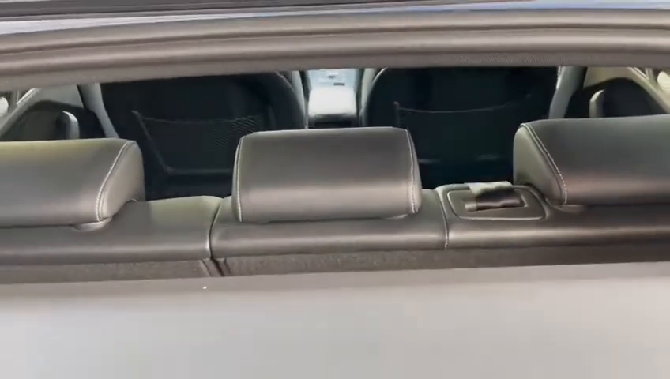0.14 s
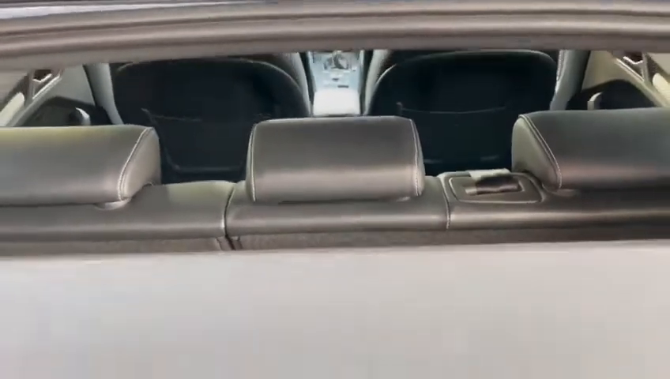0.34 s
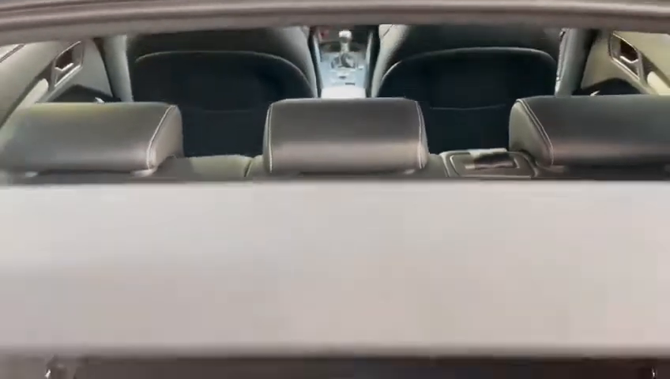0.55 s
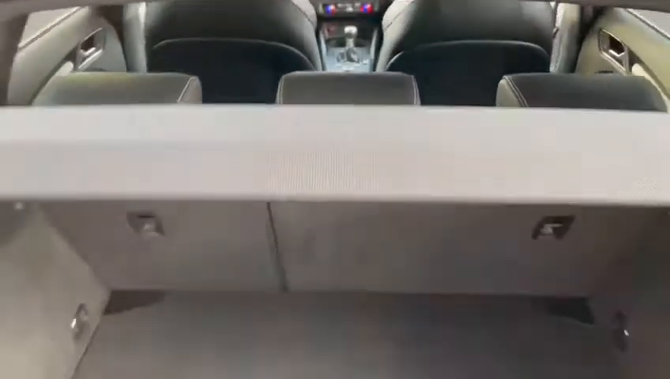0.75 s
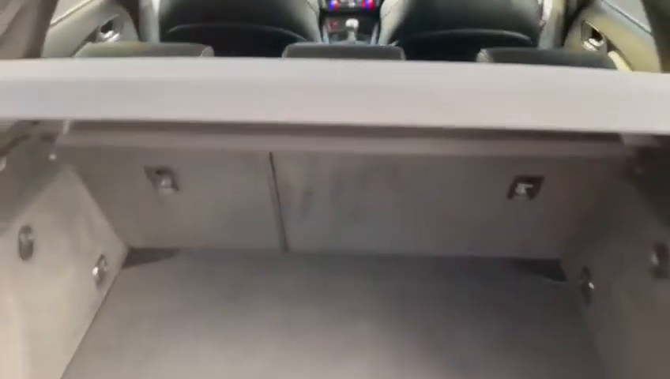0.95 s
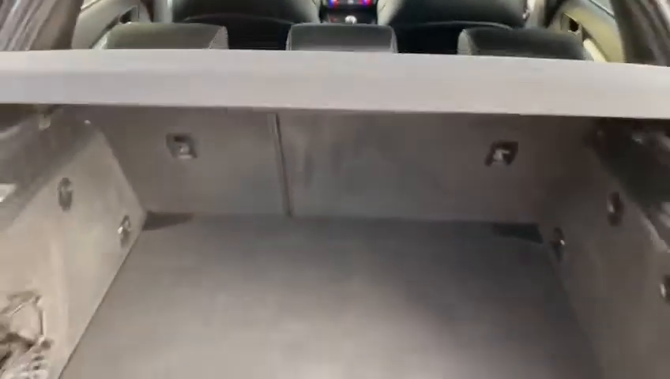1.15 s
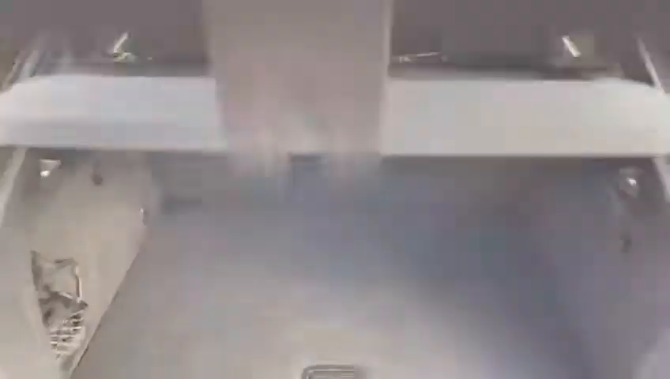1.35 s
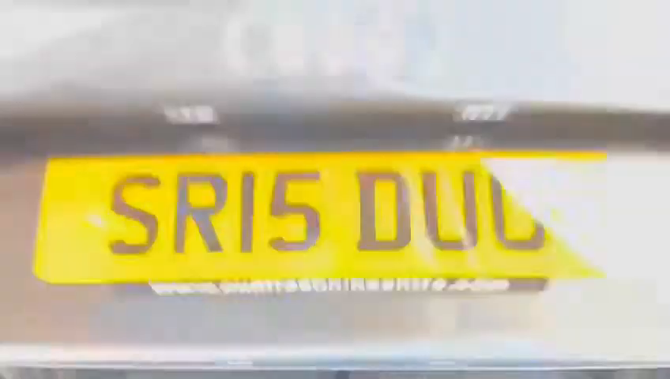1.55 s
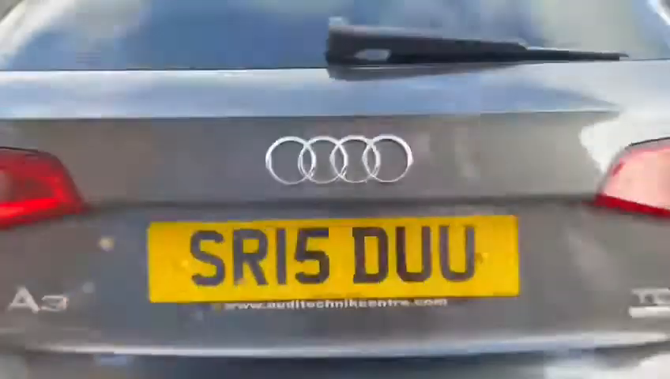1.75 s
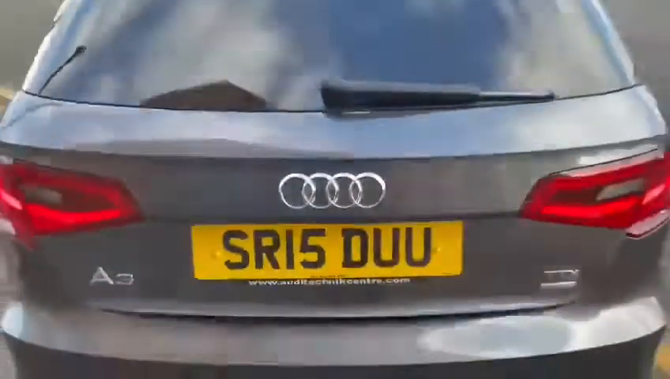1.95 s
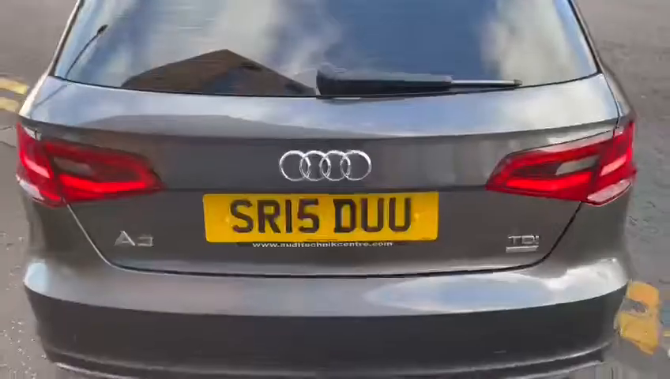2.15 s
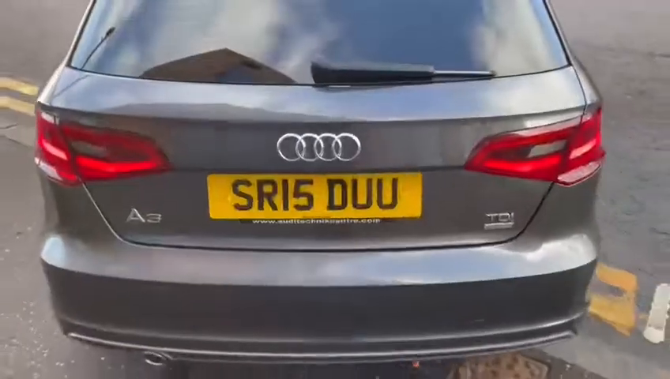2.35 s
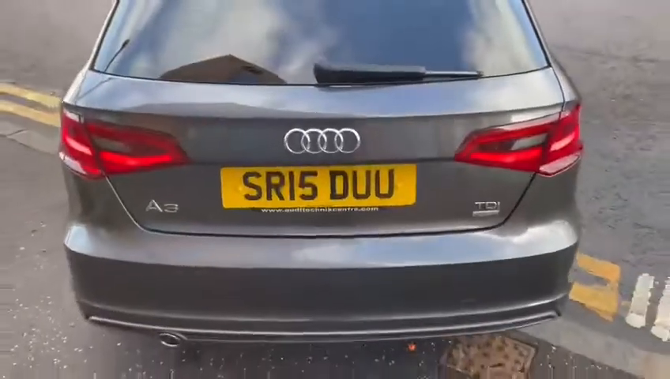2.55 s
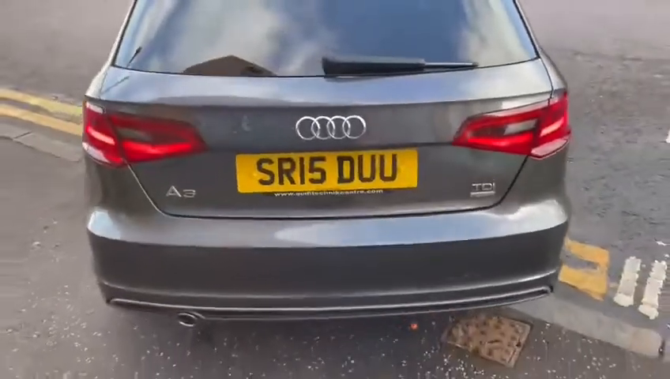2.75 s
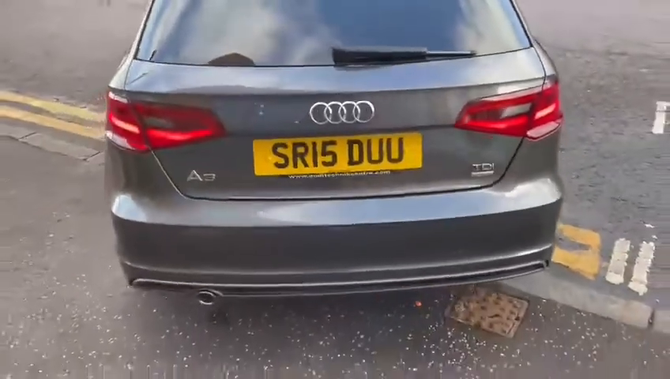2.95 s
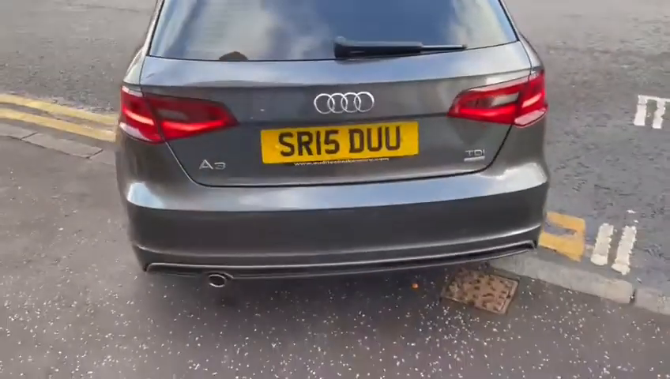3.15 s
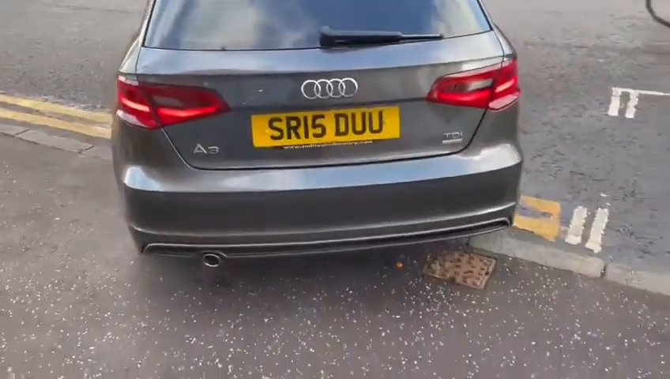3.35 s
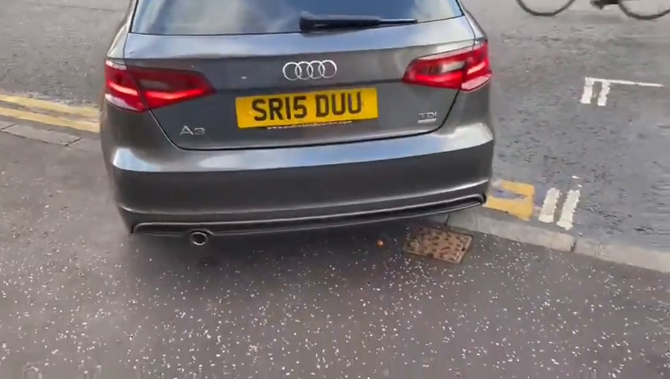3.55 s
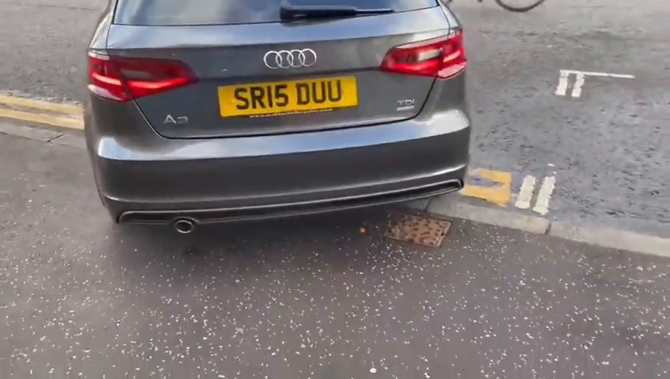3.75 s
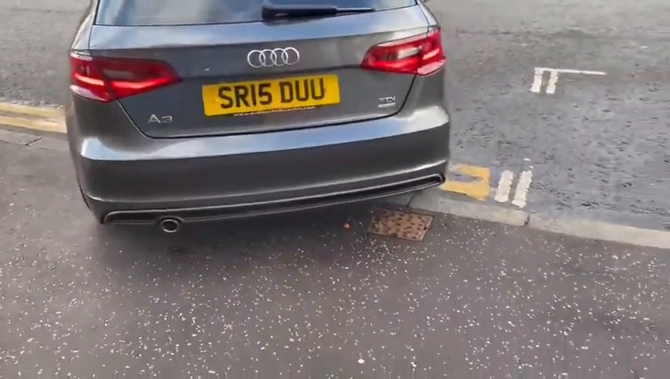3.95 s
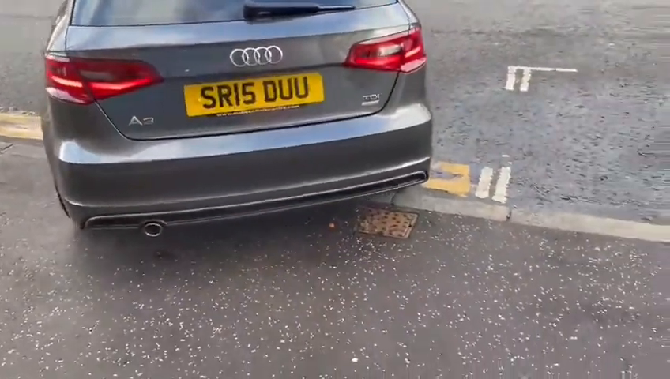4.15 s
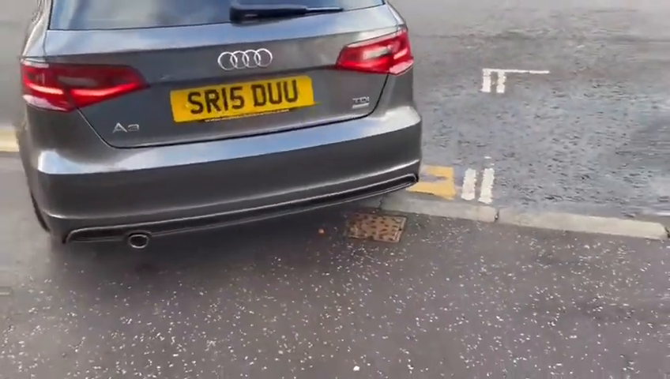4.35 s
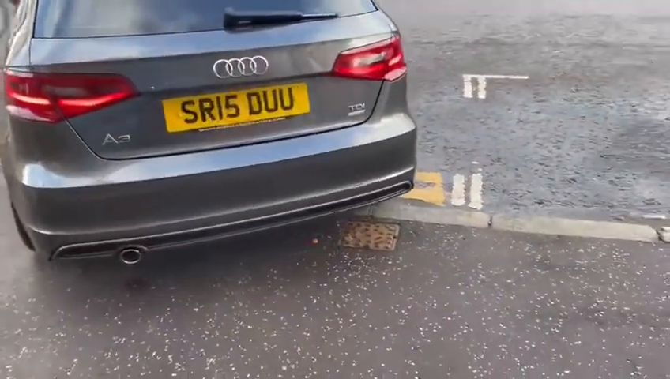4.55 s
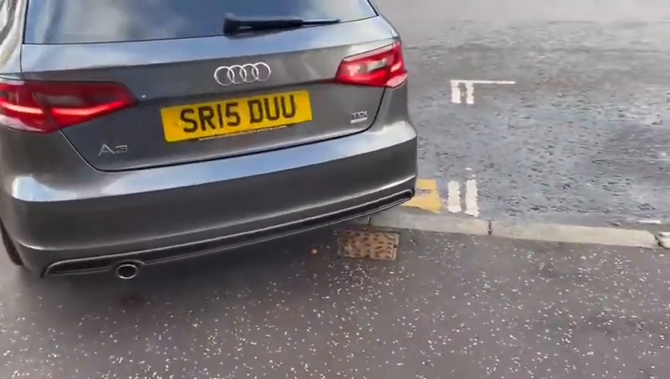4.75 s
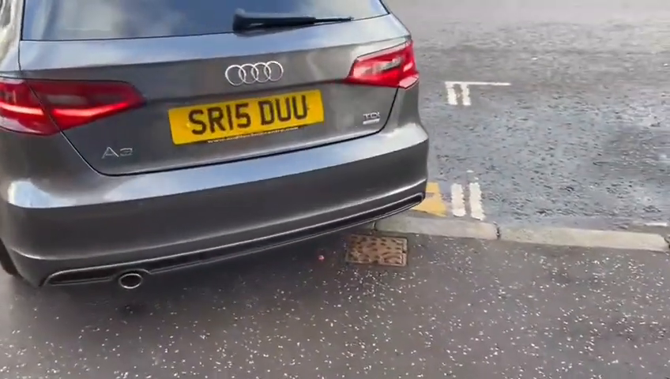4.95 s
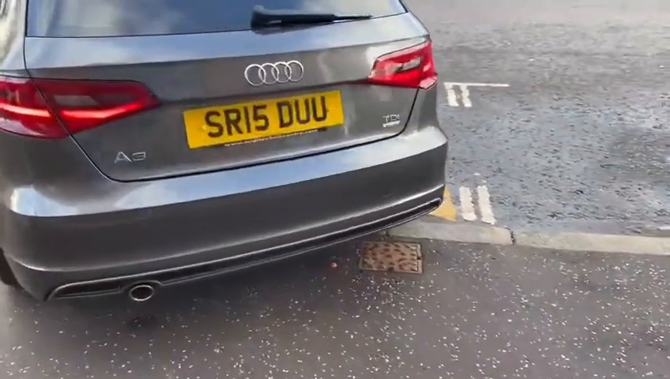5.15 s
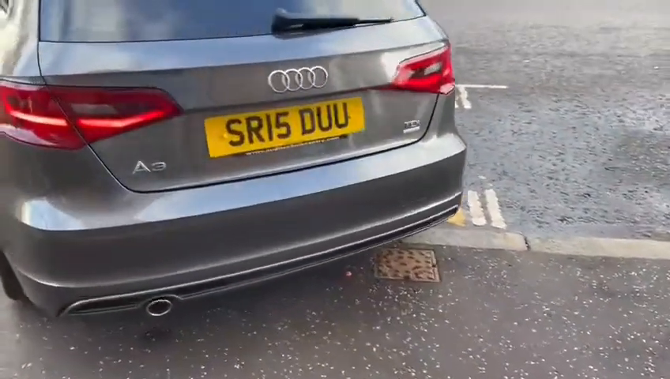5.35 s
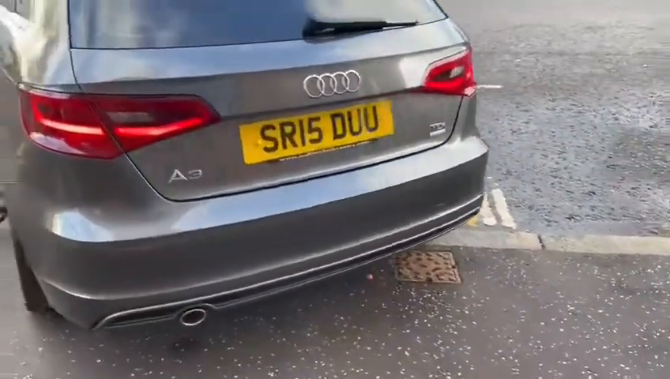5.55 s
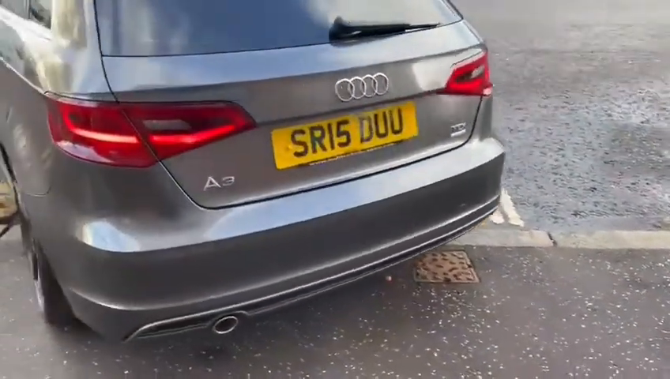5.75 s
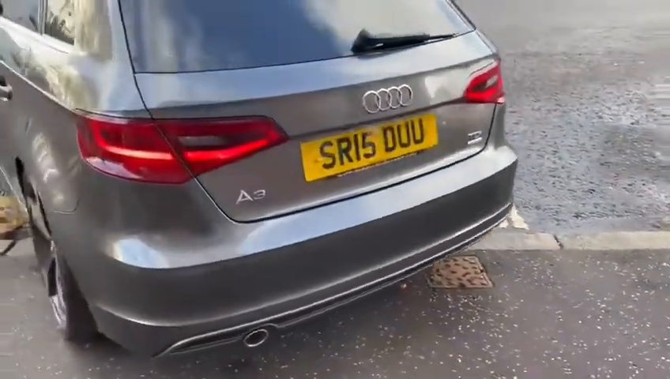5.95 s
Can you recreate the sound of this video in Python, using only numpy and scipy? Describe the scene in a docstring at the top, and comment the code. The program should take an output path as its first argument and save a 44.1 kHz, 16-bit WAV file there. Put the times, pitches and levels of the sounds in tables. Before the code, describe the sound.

A car tailgate swings down with a faint rub while wind rumbles on the microphone, then closes in one loud, close slam: the latch snaps, the metal panel rings briefly and the cabin booms, with a short echo from the street. Afterwards the gust dies away. Quiet rustles and small gritty ticks sound near the hand-held microphone, and distant town traffic with a faint wavering hum carries on throughout.

```python
"""Town traffic rumbles and a faint hum comes and goes; clothes rustle and grit ticks near a hand-held phone.
From 0.8 s a gust buffets the microphone ports. At 1.2 s a car's tailgate is pulled down on its rubbing
gas strut. Just before 2 s it slams: latch and seals strike, the steel panel rings, the cabin air booms,
trim rattles and the house fronts answer. The wind drops by 3.5 s and far vehicles drone past."""
import sys
import numpy as np
from scipy import signal
from scipy.fft import rfft, irfft, next_fast_len
from scipy.io import wavfile
from scipy.ndimage import uniform_filter1d, map_coordinates

SR = 44100
rng = np.random.default_rng(int(sys.argv[2]) if len(sys.argv) > 2 else 0)


def unload_audio(sound):
    """Save the sound as a 16-bit wav file, at the path given as the first command line argument."""
    columns = np.transpose(np.atleast_2d(sound))
    # keep every value between -1 and 1, then stretch to whole-number steps
    steps = np.round(np.clip(columns, -1, 1) * 32767)
    wavfile.write(sys.argv[1], SR, steps.astype(np.int16))


N = 265041

# how busy the street is: t/s, level/dB about its mean
TRAFFIC_FLOW = [(0, 0), (.4, -2), (1.7, 0), (2.1, 0.5), (3.6, 1), (4.3, -0.5), (4.85, 2), (5.2, 0),
                (6.01, -0.5)]
# low end of engines and gust: f/Hz, level/dB
RUMBLE_SPECTRUM = [(20, -27), (32, -26), (48, -10), (64, -2), (85, -13.5), (120, -16.5), (170, -24)]
# stereo image of the street: f/Hz, left-right likeness (-1..1)
STREET_IMAGE = [(60, 0.97), (170, 1), (260, 0.79), (450, -0.016), (700, -0.21), (1100, -0.45),
                (1500, -0.17), (2000, 0.5), (2700, 0.64), (5500, 0.64), (7500, 1), (12000, 0.99)]
# narrower image of the tailgate: f/Hz, left-right likeness (-1..1)
GATE_IMAGE = [(100, 0.89), (1500, 0.98), (2300, 0.59), (5000, 0.85), (12000, 1)]
PULL_S, PULL_LENGTH_S = 1.34, 0.44  # the gate swings down and stirs the air


def amp(db):
    """Decibels to gain."""
    return 10 ** (np.asarray(db) / 20)


def unit(x):
    """Scaled to rms 1."""
    return x / np.sqrt(np.mean(x ** 2) + 1e-20)


def along(points, hz):
    """Reads (f/Hz, value) points on a log frequency axis."""
    freqs, values = np.transpose(points)
    return np.interp(np.log(hz + 1), np.log(freqs + 1), values)


def fader(points):
    """One value per sample from (t/s, value) points."""
    return np.interp(np.arange(N) / SR, *np.transpose(points))


def bell_at(s, length):
    """A smooth rise from 0 to 1 and back around a moment."""
    return np.exp(-(2 * (np.arange(N) / SR - s) / length) ** 2)


def plateau(s, rise, hold, fall):
    """Rises from 0 to 1, holds and falls again; all in seconds."""
    return np.interp(np.arange(N) / SR, s + np.cumsum([0, rise, hold, fall]), [0, 1, 1, 0])


def swell(s, length):
    """First sample, times from the middle and bell envelope of an event; length is its width at -6 dB."""
    reach = int(1.5 * length * SR)
    t = np.arange(-reach, reach) / SR
    return round((s + t[0]) * SR), t, amp(-24 * (t / length) ** 2)


def wobble(rate):
    """A smooth random curve, rate knots a second."""
    return map_coordinates(rng.standard_normal(int(N * rate / SR) + 4), [np.arange(N) * rate / SR])


def filtered(x, response):
    """x through a complex frequency response."""
    size = next_fast_len(x.shape[-1] + 8192)
    return irfft(rfft(x, size) * response(np.fft.rfftfreq(size, 1 / SR)), size)[..., :x.shape[-1]]


def eq(points):
    """Gain against frequency from (f/Hz, level/dB) points."""
    return lambda hz: amp(along([(1, -120)] + list(points) + [(SR / 2, -120)], hz))


def band(centre, width):
    """Gain against frequency for a bell-shaped band."""
    return lambda hz: np.exp(-((hz - centre) / width) ** 2)


def noise(colour, image, count=N):
    """Stereo noise of rms 1; image lists (f/Hz, left-right likeness)."""
    def mid_side(hz):
        spread = np.arccos(np.clip(along(image, hz), -1, 1)) / 2
        return colour(hz) * [np.cos(spread), np.sin(spread)]
    mid, side = filtered(rng.standard_normal((2, count)), mid_side)
    return unit(np.array([mid + side, mid - side]))


def patchy(x, depth_db):
    """x with random patches of gain over time and frequency, at rms 1."""
    spectra = signal.stft(x, nperseg=512)[2]
    patches = uniform_filter1d(rng.standard_normal(spectra.shape[1:]), size=14, axis=0)
    patches = uniform_filter1d(patches, size=9, axis=1)
    return unit(signal.istft(spectra * amp(depth_db * unit(patches)), nperseg=512)[1][:, :N])


def engines():
    """Far engines lay down a lumpy rumble, which lifts as the gate swings."""
    level_db = -40 + 0.27 * fader(TRAFFIC_FLOW) + 6.5 * bell_at(PULL_S, PULL_LENGTH_S)
    lumps = amp(2 * wobble(30))
    return amp(level_db) * unit(lumps * noise(eq(RUMBLE_SPECTRUM), STREET_IMAGE))


def tyres():
    """Tyres on the road: a midrange roar and a thin hiss that ride the traffic flow."""
    # body of the road noise: f/Hz, level/dB
    roar_spectrum = [(150, -7), (300, -6), (450, -4.5), (700, -1.5), (1050, -3.5), (1500, -10.5),
                     (2000, -15), (2600, -22.5), (3500, -36), (5000, -47)]
    # its airy top: f/Hz, level/dB
    hiss_spectrum = [(1500, -5), (2600, 0), (4200, -1), (5600, -7.5), (7000, -9.5), (8400, -13),
                     (10000, -14.5), (11600, -15.5), (11900, -64)]
    busy_db = fader(TRAFFIC_FLOW)
    roar_db = -42.5 + 0.57 * busy_db + 2 * bell_at(PULL_S, PULL_LENGTH_S)
    roar = patchy(noise(eq(roar_spectrum), STREET_IMAGE), depth_db=1)
    hiss = patchy(noise(eq(hiss_spectrum), STREET_IMAGE), depth_db=2)
    return amp(roar_db) * roar + amp(-61.5 + busy_db) * hiss


def drones():
    """Bands of noise fade in and out as vehicles pass far off."""
    # distant pass-bys: f/Hz, width/Hz, start/s, end/s, level/dB
    passes = [(732.7, 17, 1.44, 5.15, -53.5), (1624, 28, 4.15, 5.17, -58.5), (2170, 83, 3.15, 4.14, -60.5),
              (850, 76, 3.55, 5, -55), (1300, 540, 4.24, 5, -59)]
    out, t = np.zeros((2, N)), np.arange(N) / SR
    for hz, width, start, end, db in passes:
        progress = np.clip((t - start) / (end - start), 0, 1)
        out += amp(db) * np.sin(np.pi * progress) ** 0.5 * noise(band(hz, width), [(100, 0.11)])
    return out


def hum(pitch_hz=293):
    """A faint tone that wavers in pitch and level."""
    # the hum's comings and goings: t/s, level/dB
    ride = [(0, -65.5), (1.7, -46), (2.4, -47), (2.8, -59.5), (3.8, -60), (3.93, -47.5), (4.17, -47),
            (4.3, -71), (4.52, -65), (4.62, -43), (5.1, -51), (5.4, -45), (5.5, -64), (5.6, -48),
            (5.78, -50), (6.01, -70)]
    phase = 2 * np.pi * np.cumsum(pitch_hz + 3.46 * wobble(14)) / SR
    return amp(fader(ride) + 1.1 * wobble(10)) * np.sin(phase + [[0.4], [-0.4]])


def wind(calm_db=-58, gust_db=-37.5):
    """Wind drums on the microphone ports, with one long, deep gust."""
    # colour of the buffeting: f/Hz, level/dB
    buffet_spectrum = [(25, -41), (50, -25), (110, 1), (170, -2), (300, -7), (420, -24.5), (700, -48)]
    # its stereo image: f/Hz, left-right likeness (-1..1)
    buffet_image = [(40, 1), (300, 0.4)]
    blowing = plateau(0.757, rise=0.11, hold=1.67, fall=1)
    puff_db = 9 * bell_at(2.09, length=0.31)  # air thrown out by the closing gate
    blow_db = calm_db + (gust_db - calm_db) * blowing + puff_db
    buffet_db = -48 + 8 * bell_at(PULL_S, PULL_LENGTH_S) + 3.5 * blowing
    buffet = unit(amp(3.2 * wobble(25)) * noise(eq(buffet_spectrum), buffet_image))
    # a gust stirs each port on its own, so the two sides are unrelated even in the bass
    flutter = amp(2.1 * np.array([wobble(16), wobble(21)]))
    gust = unit(flutter * noise(eq(RUMBLE_SPECTRUM), [(60, 0.0042)]))
    return amp(buffet_db) * buffet + amp(blow_db) * gust


def bumps(cycles=1.4):
    """Each bump is a swing or two of pressure around a dip, a little apart at the two ports."""
    # dull knocks of wind and hand on the phone and the moving gate: middle t/s, f/Hz, level/dB
    knocks = [(.563, 106, -27.5), (1.034, 73.4, -22), (1.092, 95, -27), (1.183, 113, -19.5),
              (1.185, 295, -23.5), (1.199, 71, -17.5), (1.238, 194, -27), (1.244, 94, -19),
              (1.269, 185, -22.5), (1.291, 115, -20.5), (1.297, 292, -28.5), (1.395, 282, -26.5),
              (1.422, 85, -16.5), (1.428, 250, -28), (1.462, 76, -29), (1.508, 80, -25), (1.551, 90, -22.5),
              (1.587, 79, -15.5), (1.648, 155, -24), (1.886, 110, -26), (1.922, 160, -15),
              (1.945, 115, -20), (1.97, 150, -14), (2.16, 165, -27.5), (2.552, 100, -24.5),
              (2.656, 88, -26), (2.911, 61.5, -25), (3.469, 68, -29.5), (3.667, 68.5, -28), (4.44, 80, -28),
              (4.535, 85, -30), (4.635, 90, -33), (4.744, 83, -29.5), (4.788, 80, -29), (4.841, 76, -27),
              (4.952, 77.6, -26.5), (5.01, 74.6, -29)]
    out = np.zeros((2, N))
    for (s, hz, db), (turn, lean) in zip(knocks, rng.uniform(-1.18, 1, (len(knocks), 2))):
        first, t, bell = swell(s, cycles / hz)
        phase = 2 * np.pi * hz * t + 1.04 * turn + 0.22 * lean * np.array([[1], [-1]])
        out[:, first:first + len(t)] -= amp(db) * bell * np.cos(phase)
    return out


def rustle(tilt_db_per_octave=-7, top_hz=11750):
    """Cloth and shoes brush: grainy hiss that swells and fades with each stroke."""
    # brush strokes: middle t/s, length/s, level/dB, low cut/Hz
    strokes = [(0.331, 0.059, -57.5, 4500), (0.81, 0.038, -63.5, 8000), (0.913, 0.11, -58.5, 4030),
               (1.211, 0.14, -60, 1500), (1.374, 0.07, -57.5, 7000), (1.398, 0.072, -55.5, 1190),
               (1.52, 0.07, -51.5, 2670), (2.206, 0.022, -65, 3000), (2.881, 0.17, -68, 9000),
               (3.325, 0.089, -59.5, 8950), (3.536, 0.085, -60.5, 3500), (4.781, 0.036, -66, 7000),
               (5.71, 0.054, -64, 8500)]
    out, grain = np.zeros((2, N)), amp(2.4 * wobble(90) + 2.1 * wobble(600))
    for s, length, db, low_hz in strokes:
        first, t, bell = swell(s, length)
        low_cut = lambda f: (f / low_hz) ** 4 / (1 + (f / low_hz) ** 4)
        colour = lambda f: amp(tilt_db_per_octave * np.log2((f + 1) / low_hz)) * low_cut(f) * (f < top_hz)
        out[:, first:first + len(t)] += amp(db) * bell * noise(colour, STREET_IMAGE, len(t))
    return out * grain


def ticks(ping_t60_cycles=22, click_t60_s=0.0075):
    """Grit and fingers tick: each a dry, broad click with a short pitched ping."""
    # small contacts: t/s, level/dB, f/Hz, click level/dB against the ping
    touches = [(.8075, -44, 9800, 1), (0.875, -27, 9300, -2), (.962, -39, 5800, 4),
               (1.39, -31.5, 2240, 2.5), (1.419, -37, 4800, 2.5), (1.4995, -41, 4400, 2.5),
               (1.519, -42, 3620, 2.5), (1.53, -31.5, 2840, 2.5), (1.543, -43, 4530, 2.5),
               (2.467, -30.5, 890, 8), (3.147, -40, 3850, 3), (3.42, -37, 4200, -8), (3.525, -43, 4200, 1),
               (3.717, -41, 10800, -2), (3.7497, -20, 6350, -10)]
    out, t = np.zeros(N), np.arange(2000) / SR
    for s, db, hz, click_db in touches:
        ping = np.sin(2 * np.pi * hz * t)
        ping *= (1 - np.exp(-t / 0.00036)) ** 2 * amp(-60 * t * hz / ping_t60_cycles)
        colour = lambda f: (f / hz) ** 3 / (1 + (f / hz) ** 6) / (1 + (f / 11500) ** 16)
        click = filtered(rng.standard_normal(len(t)), colour)
        click *= (1 - np.exp(-t / 0.00024)) ** 2 * amp(click_db - 60 * t / click_t60_s)
        out[round(s * SR):][:len(t)] += amp(db) * (ping + click)
    return out * amp([[1.5], [-1.5]])


def strut():
    """The gas strut's seal drags along its rod: a soft rub in a band of noise."""
    # short rubs: middle t/s, length/s, level/dB, f/Hz, width/Hz
    strokes = [(1.185, 0.042, -47, 850, 120), (1.206, .1, -45.5, 1075, 80), (1.289, .065, -47, 1150, 130)]
    out = np.zeros((2, N))
    for s, length, db, hz, width in strokes:
        first, t, bell = swell(s, length)
        rub = bell * noise(band(hz, width), GATE_IMAGE, len(t))
        out[:, first:first + len(t)] += amp(db) * unit(rub) * np.sqrt(np.mean(bell ** 2))
    return out


def house_fronts(x, t60_s=0.47):
    """House fronts send back a short, dull reverb tail."""
    t = np.arange(SR // 2) / SR
    colour = eq([(100, 3.5), (1500, 2.5), (6000, -13.5), (12000, -26)])
    tail = noise(colour, [(100, 1.0), (1000, 0.42)], len(t)) * amp(-60 * t / t60_s)
    return signal.fftconvolve(x, tail / np.linalg.norm(tail[0]), axes=1)[:, :N]


def cabin_boom(cycles=2.6):
    """The closing gate squeezes the cabin air, which swings a few times and is damped by the seats."""
    # the gate lands, rebounds and settles: t/s, f/Hz, level/dB, swing gain (+ out first, - in first)
    pushes = [(1.9788, 62, -4, -0.96), (2.017, 71, -20, 1), (2.046, 72.3, -15, -1),
              (2.096, 58, -23.5, -1.1), (2.158, 71, -25, 0.91), (2.186, 80, -19.5, -0.81)]
    out = np.zeros((2, N))
    for s, hz, db, swing in pushes:
        turns = np.arange(int(cycles / hz * SR)) * hz / SR
        fade = np.sin(np.pi * turns / cycles) ** 0.8
        pressure = np.sin(2 * np.pi * (turns + [[0.015], [-0.015]]))
        out[:, round(s * SR):][:, :len(turns)] += swing * amp(db) * fade * pressure
    return out


def panel(hz, seal_hz=6000):
    """The gate's resonances; rubber seals soften the top of every blow."""
    # modes of sheet steel and glass: f/Hz, width/Hz, level/dB
    modes = [(170, 30, 5), (270, 38, 3), (370, 60, -1), (570, 48, -1.5), (703, 30, -8), (860, 25, -11),
             (980, 26, -14), (1139, 28, -3.5), (1390, 33, -11), (1507, 28, -10), (1882, 40, -4.5),
             (2200, 67, -14), (2380, 45, -10), (2790, 110, -14)]
    body = sum((-1) ** k * amp(db) * 1j * hz * width / (centre ** 2 - hz ** 2 + 1j * hz * width)
               for k, (centre, width, db) in enumerate(modes))
    return body / (1 + 1j * hz / seal_hz)


def tailgate(part_peak_s=0.0035, crack_t60_s=0.012):
    """Each contact rings the part struck and the panel, with clatter and a bright snap on top."""
    # hits of latch, seals and trim: t/s, level/dB, snap level/dB, clatter t60/s, part f/Hz, part level/dB
    contacts = [(1.916, -10.5, -20, 0.051, 940, -10.5), (1.926, -13.5, -7.5, 0.13, 1150, -10),
                (1.9325, -21, -17, 0.046, 686, 8.5), (1.9355, -33, -5, 0.067, 455, 9),
                (1.951, -27, -10, 0.066, 368, 9), (1.946, -16, -15, 0.08, 1145, -3.5),
                (1.969, -31.5, -15, 0.04, 215, 14.5), (1.9747, -29, -21, 0.044, 341.3, 23.5),
                (1.9753, -13, -14, 0.09, 268, -4), (1.9795, -14, -14.5, 0.11, 367, -2.5),
                (1.9998, -16, -17, 0.063, 557, 0), (2.018, -31, -13, 0.26, 170, 16),
                (2.038, -32.5, -14, 0.15, 225, 16.5), (2.046, -22.5, -17.5, 0.038, 2400, -9.5),
                (2.051, -31.5, -20, 0.036, 1830, 0.5), (2.085, -38, -30, 0.06, 228, 10.5)]
    # midrange clatter: f/Hz, level/dB
    clatter_spectrum = [(420, -6.5), (800, -6.5), (2000, -14), (3400, -20), (5000, -37)]
    # bright edge of a hit: f/Hz, level/dB
    snap_spectrum = [(2500, -2), (4000, -6), (5200, -2.5), (7300, -5), (8800, -9), (10500, -13.5),
                     (11700, -16), (12050, -60)]
    out, t = np.zeros((2, N)), np.arange(SR // 2) / SR
    attack = 1 - np.exp(-t / 0.00049)
    part_envelope = t / part_peak_s * np.exp(1 - t / part_peak_s)
    crack = amp(4.5 - 60 * t / crack_t60_s)  # steel on steel: the snap's first instant tops its tail
    burst = lambda colour: attack * noise(colour, GATE_IMAGE, len(t))
    for s, db, snap_db, t60, part_hz, part_db in contacts:
        force = burst(np.ones_like) * amp(-60 * t / (0.8 * t60))  # dying chatter
        force[:, 8] += amp(20.5)  # the blow itself
        ring = amp(12.5) * filtered(force, panel)
        part = amp(part_db) * part_envelope * np.sin(2 * np.pi * part_hz * t)
        rattle_db = 1.9 * wobble(315)[:len(t)]  # loose parts make the snap uneven
        clatter = amp(-5.5) * burst(eq(clatter_spectrum)) * amp(-60 * t / t60)
        snap_tail = amp(rattle_db - 60 * t / (0.94 * t60))
        snap = amp(snap_db - 3) * burst(eq(snap_spectrum)) * (crack + snap_tail)
        out[:, round(s * SR):][:, :len(t)] += amp(db) * (part + ring + clatter + snap)
    return out * amp([[0.6], [-0.6]])


def scene():
    """The slam up front, small movements around it and the street as a bed."""
    gate = tailgate()
    slam = gate + amp(-20) * house_fronts(gate) + cabin_boom()
    movement = strut() + bumps() + rustle() + ticks()
    street = hum() + drones() + engines() + wind() + tyres()
    return slam + movement + street


def record(dry, top_hz=12800):
    """The phone's ports turn the treble phase apart, and a steep low-pass cuts the top."""
    # the two ports ring at different treble pitches: f/Hz, left channel's lead/turns
    port_lead = [(6000, 0.0051), (6600, 0.2), (7300, 0.3), (7800, 0.48), (8700, 0.5), (9200, 0.6),
                 (9900, 0.8), (10500, 0.96)]
    twist = lambda hz: np.exp(1j * np.pi * along(port_lead, hz) * np.array([[1], [-1]]))
    return filtered(dry, lambda hz: twist(hz) / (1 + (hz / top_hz) ** 200))


dry = scene()
out = record(dry)
unload_audio(out)
```